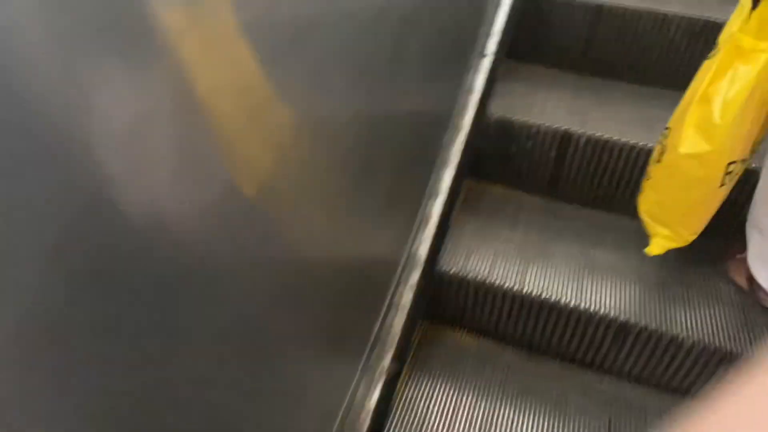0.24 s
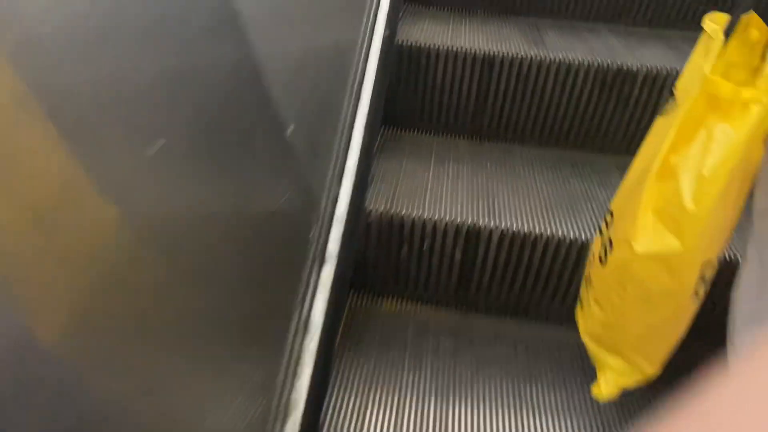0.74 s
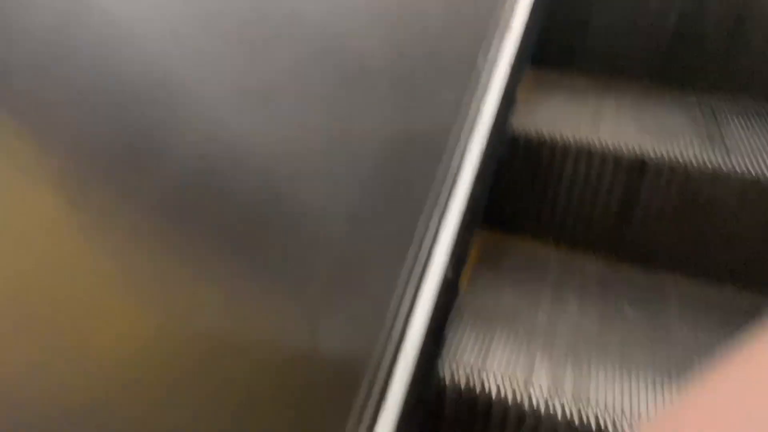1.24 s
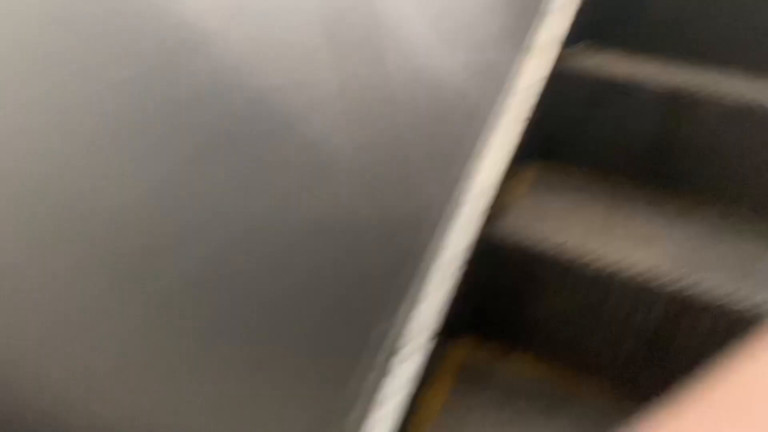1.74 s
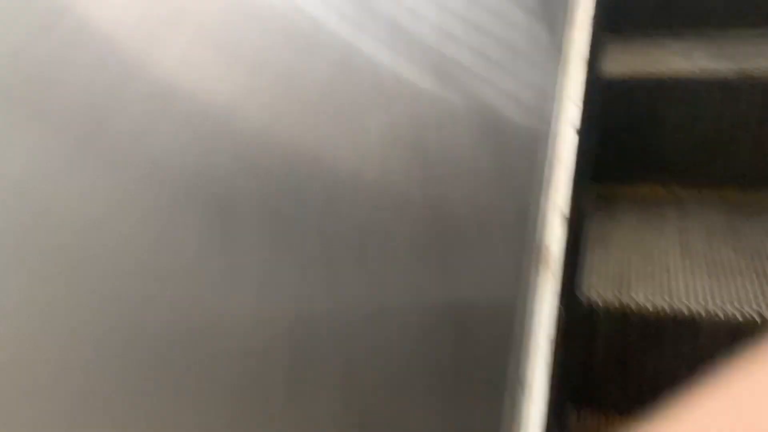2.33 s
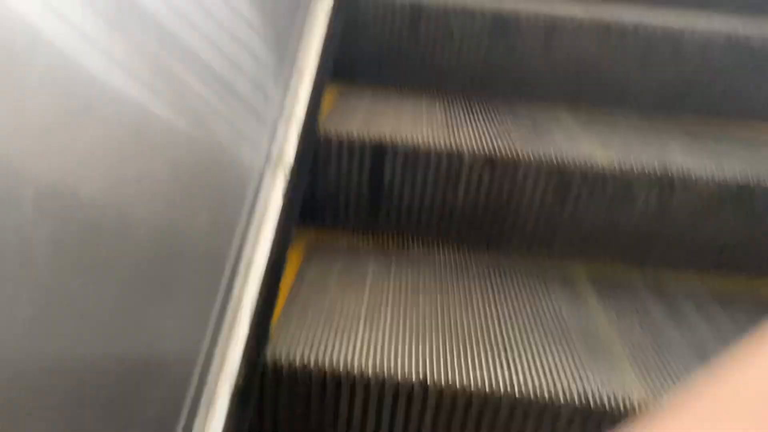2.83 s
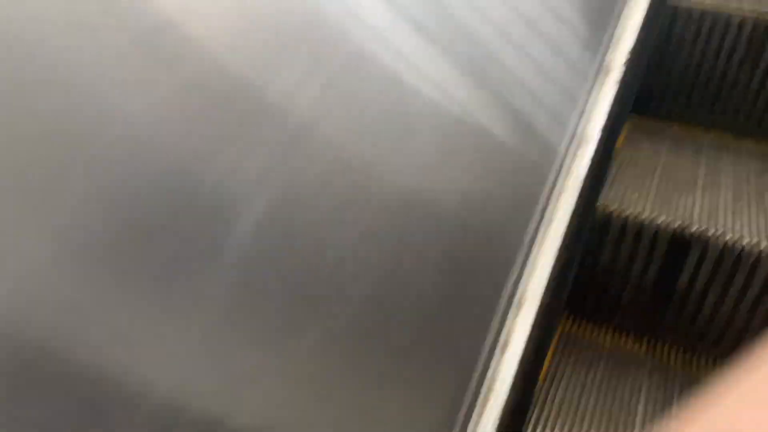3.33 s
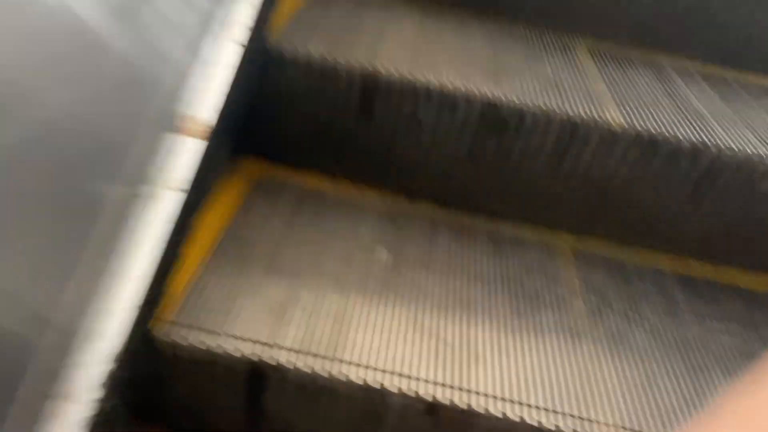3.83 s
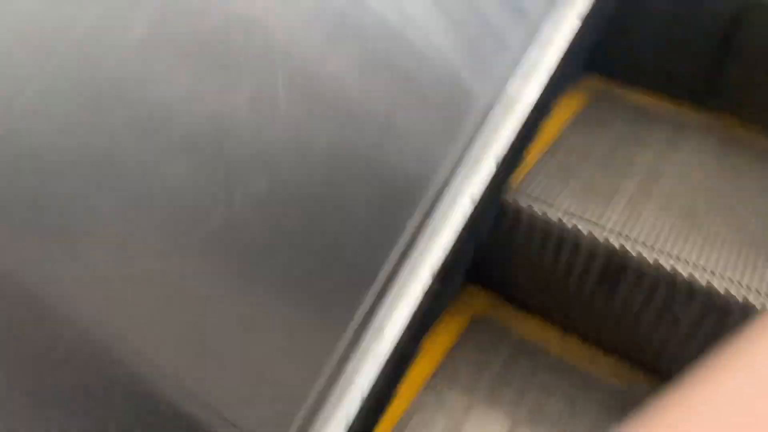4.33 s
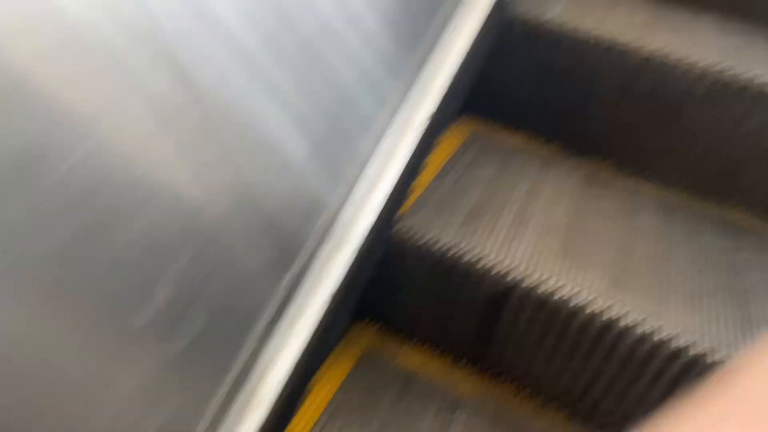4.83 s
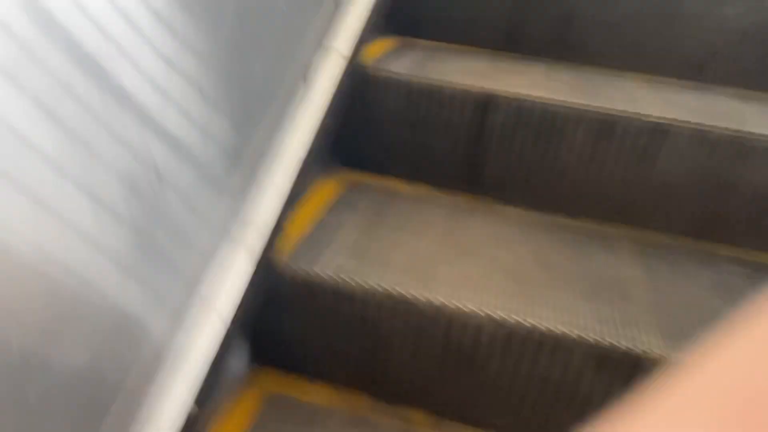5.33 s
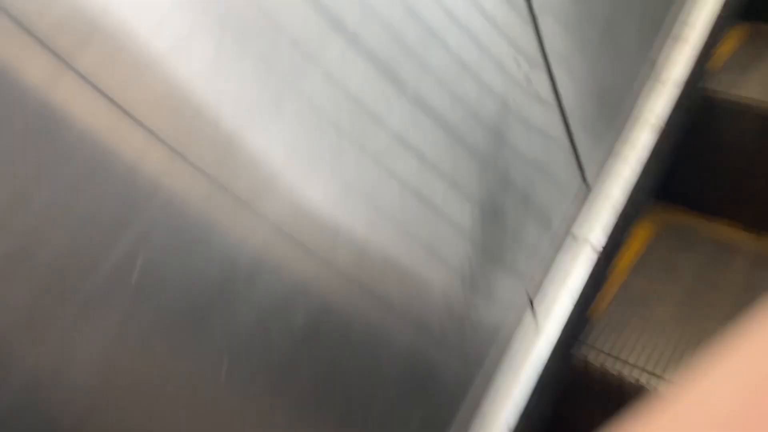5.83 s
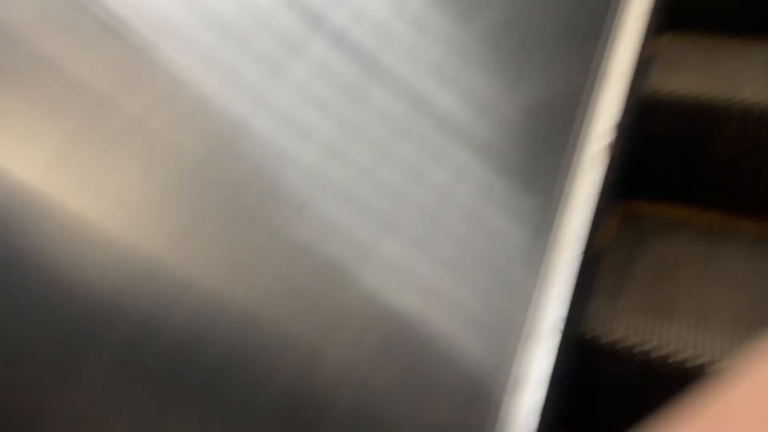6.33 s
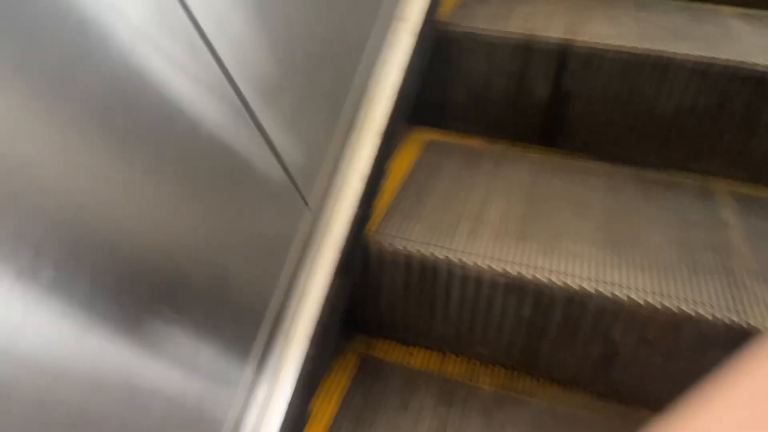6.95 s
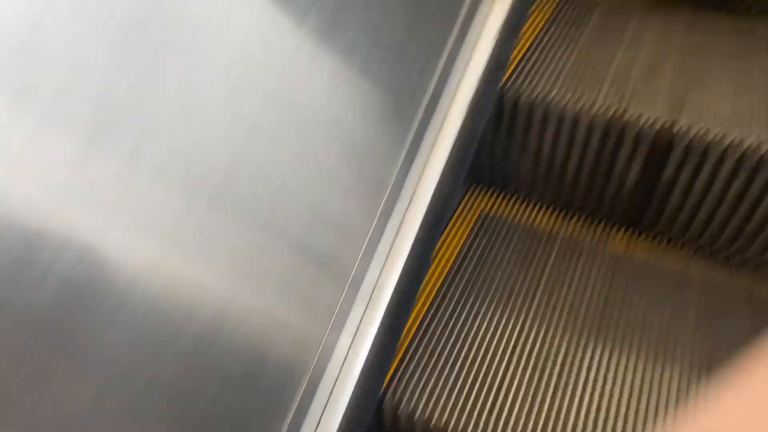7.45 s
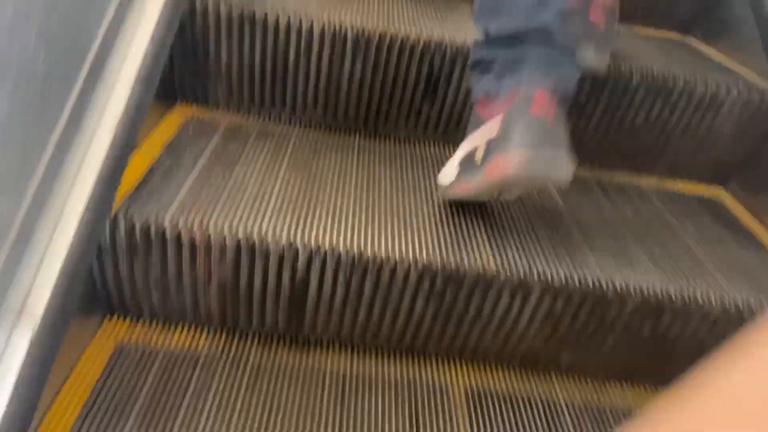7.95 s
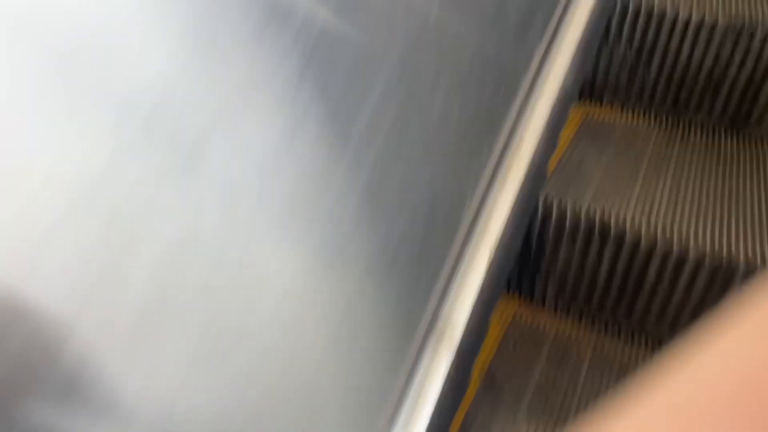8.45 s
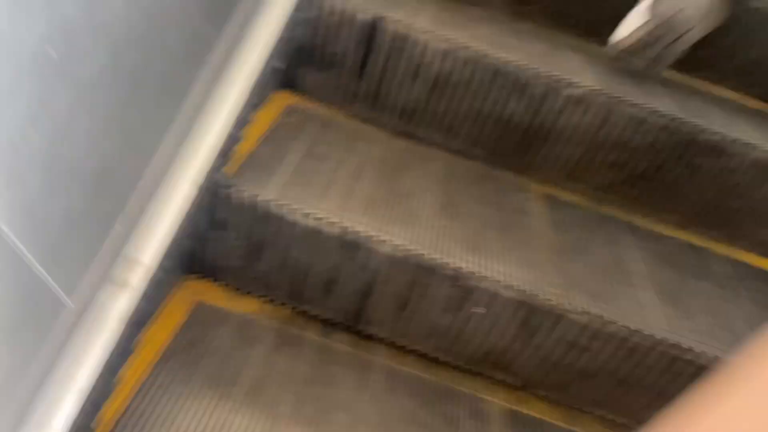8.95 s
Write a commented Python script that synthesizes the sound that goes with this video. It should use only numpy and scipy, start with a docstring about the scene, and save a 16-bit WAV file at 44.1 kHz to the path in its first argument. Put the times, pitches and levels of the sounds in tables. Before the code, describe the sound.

Rollers rumble and rattle steadily under an escalator rider in a tiled hall, while the drive hums in slow swells. At first a thin whine comes and goes and the metal steps knock lightly. Later their hollow clacks grow harder and closer together, ringing briefly off the walls. Near the hand-held microphone, thin material gives tiny crinkles, something brushes the side panel once, and the treads are softly scuffed.

```python
"""A running escalator in a tiled hall, heard from its steps through a hand-held stereo microphone.
The drive hums, swelling as the rider passes through its standing waves; rollers rumble and rattle,
and the hollow metal steps clack, louder in the second half, with the hard walls answering.
A thin whine is left behind early on. Close to the microphone, thin material crinkles,
something brushes the side panel, and the treads are softly scuffed."""
import sys
import numpy as np
from scipy import signal
from scipy.fft import rfft, irfft, next_fast_len
from scipy.io import wavfile
from scipy.ndimage import uniform_filter1d, minimum_filter1d, map_coordinates

SR = 44100
rng = np.random.default_rng(int(sys.argv[2]) if len(sys.argv) > 2 else 0)


def log_audio(samples):
    """Write samples as a 16-bit WAV file to the path given in sys.argv[1]."""
    # one column per channel
    frames = np.atleast_2d(samples).T
    # limit to full scale, then quantise
    limited = np.clip(frames, -1, 1)
    pcm = np.round(limited * 32767).astype(np.int16)
    wavfile.write(sys.argv[1], SR, pcm)


N = 404838

# modes of a hollow metal step: (frequency [Hz], relative level [dB], t60 [s])
STEP_MODES = [(416, -2, 0.28), (485, -1.5, 0.44), (580, -9, 0.33), (629, 0, 0.23), (742, 2.5, 0.35),
              (797, 4.5, 0.36), (857, -9, 0.32), (1044, -3.5, 0.34), (1270, -5.5, 0.13), (1436, -1, .17),
              (1725, -2, 0.13), (2050, -2.5, .11), (2210, -3.5, 0.12), (2350, 0, 0.13)]


def amp(db):
    """Decibels to gain."""
    return 10 ** (np.asarray(db) / 20)


def unit(x):
    """Scale to rms 1."""
    return x / np.sqrt(np.mean(x ** 2) + 1e-20)


def along(points, hz):
    """Read (frequency, value) points on a log axis."""
    freqs, values = np.transpose(points)
    return np.interp(np.log(hz + 1), np.log(freqs + 1), values)


def curves(rows):
    """One value per sample for each column after the time."""
    times, *columns = np.transpose(rows)
    return [np.interp(np.arange(N) / SR, times, column) for column in columns]


def wobble(rate, size=N):
    """A smooth random curve, rate knots a second."""
    knots = rng.standard_normal(int(size * rate / SR) + 4)
    return map_coordinates(knots, [np.arange(size) * rate / SR])


def arch(start_s, length_s):
    """Half a sine over the given stretch, zero outside it."""
    return abs(np.sin(np.pi * np.clip((np.arange(N) / SR - start_s) / length_s, 0, 1)))


def envelope(start_s, length_s, attack_s, release_s):
    """Rise, hold until the length is over, die away."""
    t = np.arange(N) / SR - start_s
    return np.clip(t / attack_s, 0, 1) * np.exp(-np.maximum(t - length_s, 0) / release_s)


def filtered(x, response):
    """Pass x through a frequency response."""
    size = x.shape[-1]
    padded = next_fast_len(size + SR // 4)
    return irfft(rfft(x, padded) * response(np.fft.rfftfreq(padded, 1 / SR)), padded)[..., :size]


def noise(colour_db, size=N):
    """Coloured stereo noise of rms 1; the two microphone ports agree best in the bass."""
    # likeness of left and right: (frequency [Hz], correlation before clipping)
    likeness = [(100, 1), (330, 0.98), (500, 0.74), (800, 0.34), (1500, 0.86), (2400, 0.54), (4000, 0.52),
                (6000, 0.16), (7500, -1.9), (11500, -0.89), (13000, 0.96)]

    def mid_and_side(hz):
        angle = np.arccos(np.clip(along(likeness, hz), -1, 1)) / 2
        return amp(colour_db(hz)) * [np.cos(angle), np.sin(angle)]

    mid, side = filtered(rng.standard_normal((2, size)), mid_and_side)
    return unit(np.array([mid + side, mid - side]))


def dying(x, t60s):
    """Let each frequency of x die at its own speed."""
    hz, t, bands = signal.stft(x, SR, nperseg=256)
    fade = np.exp(-np.log(1000) * t / along(t60s, hz)[:, None])
    return signal.istft(bands * fade, SR, nperseg=256)[1][:, :x.shape[1]]


def patchy(x, depth_db):
    """Narrow bands swell and fade on their own."""
    bands = signal.stft(x, nperseg=2048)[2]
    patches = uniform_filter1d(rng.standard_normal(bands.shape[1:]), size=3, axis=0)
    patches = unit(uniform_filter1d(patches, size=7, axis=1))
    return unit(signal.istft(bands * amp(depth_db * patches), nperseg=2048)[1][:, :N])


def resonances(hz, width_hz):
    """Humps of height 1 at the modes of a step."""
    return sum(1 / (1 + ((hz - mode_hz) / width_hz) ** 2) for mode_hz, _, _ in STEP_MODES)


def ringing(t, hz, gain, t60, port_spread_rad):
    """Decaying modes, each at a slightly different phase in the two ports."""
    phase = 2 * np.pi * rng.random(hz.shape) + rng.normal(0, port_spread_rad, (2, *hz.shape))
    return np.sum(gain * np.exp(-np.log(1000) * t / t60) * np.sin(2 * np.pi * hz * t + phase), axis=1)


def add(track, start_s, sound):
    """Mix a sound into the track."""
    stretch = track[:, max(round(start_s * SR), 0):][:, :sound.shape[-1]]
    stretch += sound[..., :stretch.shape[1]]


def drive_hum(drive_hz=65.15, swell_db=-0.43, waver_db=0.5, drift_rad=0.12, blur_rad=0.13):
    """Four orders of the motor swell and fade as the microphone rides through their standing waves."""
    # from one node to the next: (order, start [s], length [s], peak [dB])
    passages = [(1, -0.85, 2.95, -25), (1, 2.5, 3.38, -17.5), (1, 6, 1.85, -19), (1, 8, 2.5, -16.5),
                (2, 0.3, 0.8, -25.5), (2, 1, 0.9, -21), (2, 3, 1.25, -20.5), (2, 4.35, .55, -22.5),
                (2, 5.15, 1.614, -18.5), (2, 6.7, 1.65, -20), (3, 2.8, 0.8, -27.5), (3, 5.5, .6, -27),
                (3, 7.4, 1.2, -29), (4, 5.5, 1.2, -31), (4, 7.9, 1, -31), (4, 9, .7, -24.5)]
    # orders 1 to 4: power of a swell's half sine, lower is flatter
    shapes = (0.94, 0.5, 0.63, 0.67)
    # hum between swells, orders 1 to 4: (starting level [dB], rise [dB/s], waver [dB])
    beds = [(-40.5, 1.2, 1), (-35.5, -0.4, 2), (-33.5, 0.2, 1.5), (-42, 0.7, 1)]
    t = np.arange(N) / SR
    hum = np.zeros(N)
    for k, (db, rise_db_per_s, bed_waver_db) in enumerate(beds, 1):
        bed = amp(db + rise_db_per_s * t + bed_waver_db * wobble(3.5))
        swells = sum(amp(peak_db + swell_db) * arch(start, length) ** shapes[k - 1]
                     for order, start, length, peak_db in passages if order == k)
        phase = 2 * np.pi * (k * drive_hz * t + rng.random())
        phase += k * drift_rad * wobble(3) + (k - 1) * blur_rad * wobble(18)
        hum += np.sqrt(2) * np.hypot(bed, swells) * amp(waver_db * wobble(7)) * np.sin(phase)
    return hum


def whine(pitch_hz=4003, waver_db=1.5, blur_rad=0.2, attack_s=0.015, release_s=0.015, bed_db=-68):
    """A thin, slightly blurred tone that comes in fluttering spells and is left behind."""
    # louder spells: (start [s], length [s], level [dB])
    spells = [(-.02, 0.11, -45.5), (.11, .18, -52), (.71, .15, -51), (.87, 0.16, -45.5), (1.038, .13, -51),
              (1.18, 0.039, -44), (1.27, .6, -57), (2.58, 0.49, -51.5), (3.1, .55, -52)]
    phase = 2 * np.pi * pitch_hz * np.arange(N) / SR
    level = amp(bed_db) + sum(amp(db) * envelope(start, length, attack_s, release_s)
                              for start, length, db in spells)
    flutter = amp(waver_db * wobble(22))
    return level * flutter * np.sin(phase + blur_rad * np.array([wobble(35), wobble(35)]))


def running_gear(rumble_db=-21, roller_db=-26, hiss_db=-44, ring_db=4):
    """Underfoot, rollers rumble in the truss and rattle the steps, whose modes stand out of the noise."""
    # level changes along the ride: (time [s], rumble [dB], rollers [dB], hiss [dB])
    ride = [(0, -3, -1.5, -1.5), (1.2, -0.5, -2.5, -0.2), (2.2, -0.5, 0, 1.5), (3.3, 0.5, 0.4, 0.9),
            (4.1, -0.5, -0.5, 0.5), (5.5, 0.5, 0.5, 0.5), (6.6, 1, 0, -0.8), (7.8, 0.5, 0.1, 1),
            (9.18, 1.5, 1.5, 1.5)]
    # spectra of the three layers: (frequency [Hz], relative level [dB])
    rumble_colour = [(15, -29), (28, -22), (42, -3), (52, -0.5), (70, -1.5), (95, 2), (125, -0.5),
                     (165, -4), (240, -5.5), (330, -10), (500, -19.5), (1000, -84)]
    roller_colour = [(150, -22), (300, -1), (450, 0.5), (680, -1.5), (820, -4), (920, -7), (1150, -8.5),
                     (1650, -12.5), (2250, -10.5), (2650, -17), (3200, -22), (4500, -25.5), (7000, -75)]
    hiss_colour = [(1500, -9), (3000, -0.5), (4200, 1.5), (5500, -1.5), (6500, -8.5), (7500, -41),
                   (9000, -6), (10300, -9.5), (12000, -12.5), (13500, -45), (15800, -7.5)]
    rumble_ride_db, roller_ride_db, hiss_ride_db = curves(ride)
    rumble_gain = amp(rumble_ride_db + rumble_db + 1.05 * wobble(7.9))
    rumble = rumble_gain * noise(lambda hz: along(rumble_colour, hz))
    rattle_db = 0.41 * wobble(45) + 0.62 * wobble(8)
    rolling = noise(lambda hz: along(roller_colour, hz) + ring_db * resonances(hz, width_hz=2.6))
    rollers = amp(roller_ride_db + roller_db + rattle_db) * patchy(rolling, depth_db=2)
    flicker_db = 0.77 * wobble(25) + 0.41 * wobble(5.3)
    hiss = amp(hiss_ride_db + hiss_db + flicker_db) * noise(lambda hz: along(hiss_colour, hz))
    return rumble + rollers + hiss


def struck_spot(t, body_hz, body_db, clang_hz, clang_db, clang_t60=0.052, split=0.077):
    """The spot hit sets the pitch: a hollow low mode and a short clang of three close higher ones."""
    body_t60 = 0.15 * amp(0.55 * body_db)  # rings longer when struck squarely
    clang = [(clang_hz * (1 + k * split), amp(clang_db) / np.sqrt(3), clang_t60) for k in (-1, 0, 1)]
    hz, gain, t60 = np.transpose([(body_hz, amp(body_db), body_t60), *clang])[:, :, None]
    return ringing(t, hz, gain, t60, port_spread_rad=0.4)


def step_blows(blows, level_db=-4, ring_db=-12, hollow_db=5, crack_db=6, crack_s=0.0092,
               rebound_db=0.5, snap_s=0.0086, rub_db=-8, rough_db=4):
    """Each blow snaps, sets off a dense clatter in the hollow step and leaves its modes ringing."""
    # spectra of the clatter and the crisp first contact: (frequency [Hz], relative level [dB])
    clatter_colour = [(120, -1), (250, -1), (450, 6), (800, -1), (930, 0), (1250, -0.5), (1700, -4),
                      (2100, 1), (2450, -4.5), (2900, -12.5), (4000, -23), (6000, -25), (8000, -89),
                      (12000, -59)]
    snap_colour = [(2000, -10), (2900, 2), (3600, -2.5), (4300, -9), (6000, -12), (7500, -47), (10000, -19),
                   (13000, -44)]
    # decay of the step's shell: (frequency [Hz], t60 [s])
    shell_decay = [(300, 0.18), (800, 0.18), (2200, 0.19), (5000, 0.24), (12000, 0.027)]
    out, t = np.zeros((2, N)), np.arange(SR // 2) / SR
    hz, mode_db, t60 = np.transpose(STEP_MODES)[:, :, None]
    for start, db, thud_db, edge_db, snap_db, *spot, slide_s in blows:
        # where the step is hit tilts its colour
        tilt = [(530, thud_db), (1190, 0), (2440, edge_db), (3600, -4)]

        def colour_db(f):
            return along(clatter_colour, f) + along(tilt, f) + hollow_db * resonances(f, width_hz=10.6)

        clatter = dying(noise(colour_db, len(t)), shell_decay)
        strength = amp(mode_db + 0.5 * along(tilt, hz) + rng.normal(0, 1.9, hz.shape))
        ring = ringing(t, hz, strength, t60, port_spread_rad=0.39)
        ring *= amp(ring_db + 0.6 * edge_db)  # most after a blow on the edge
        # the step has play: it touches twice within a few milliseconds
        rebound_s = rng.uniform(0.004, 0.008)
        first_db = (crack_db + 0.16 * edge_db) * np.exp(-t / crack_s)
        second_db = rebound_db * np.exp(-(2 * (t - rebound_s) / crack_s) ** 2)
        clatter *= amp(first_db + second_db)
        # a sliding contact starts more softly, then catches and lets go
        onset = 1 - np.exp(-t / (0.0005 + 0.15 * slide_s))
        slid = t / slide_s
        rub = slid * np.exp(1 - slid) * amp(rub_db + rough_db * wobble(220, len(t)))
        snap = amp(snap_db) * (np.exp(-t / snap_s) + rub) * noise(lambda f: along(snap_colour, f), len(t))
        scrape = rub * noise(colour_db, len(t))
        blow = clatter + scrape + snap + ring + struck_spot(t, *spot)
        add(out, start, amp(db + level_db) * onset * blow)
    return out


def knocks(per_s=2.5, level_db=-30.5, spread_db=4, thud_db=3, edge_db=-8.5, snap_db=-20,
           body_hz=630, body_db=-9, clang_hz=1700, clang_db=-9, slide_s=0.013):
    """Faint dull blows in the steps, at loosely even times and scattered pitches."""
    blows = []
    for k, (when, force, pitch) in enumerate(rng.random((int(per_s * N / SR), 3))):
        db = level_db + spread_db * (2 * force - 1)
        detune = 2 ** (pitch - 0.5)
        blows.append(((k + when) / per_s, db, thud_db, edge_db, snap_db,
                      body_hz * detune, body_db, clang_hz * detune, clang_db, slide_s))
    return step_blows(blows)


def clacks():
    """The metal steps clack, harder in the second half of the ride."""
    # (time [s], level [dB], thud [dB], edge [dB], snap [dB], body [Hz], body [dB], clang [Hz],
    # clang [dB], slide [s]); thud and edge are the clatter's low and bright parts against its middle
    blows = [(0.603, -19.5, 5, -14, -25, 516, 3, 1300, -10, 0.03),
             (1.296, -18, 6, -14, -25, 465, -6, 1300, -6, .008),
             (1.835, -20, 3, -6, -8, 625, -9, 2120, -8, 0.014),
             (2.263, -14.5, -2, -19, -22, 787, 1, 1260, -2, .001),
             (2.674, -19, 0, -7, -20, 620, -1, 2000, -8, .002),
             (3.156, -18.5, -1, -9.5, -22, 740, -5, 1266, -1, .001),
             (3.83, -16, -4.5, -15, -30, 631, 0, 1850, -4, .001),
             (4.439, -16, 5.5, -5, -16, 444, -3, 1400, -12, .012),
             (4.494, -23, -3, -9, -15, 500, 0, 2100, -6, 0.006),
             (4.579, -15, -2.5, -8, -17, 837, -1, 1950, 0, 0.0036),
             (5.047, -18, -1, -14, -16.5, 750, -5, 1330, -2, 0.0023),
             (5.474, -16.5, -3.5, -3.5, -16, 504, 3.5, 2320, -3, .003),
             (5.772, -19, -2, -6, -19, 636, -3, 2100, -2, .012),
             (5.819, -17.5, 4, -17, -22, 480, 0, 1270, 0, 0.0066),
             (6.089, -12.5, -2.5, -1, -11, 496, 4.5, 2590, 3.5, 0.0032),
             (6.41, -20, 0, 0.5, -21, 796, 4, 2070, 1, .012),
             (6.531, -19, -5, -9, -9.5, 801, 2, 1260, -4, .011),
             (6.581, -19.5, 8, -2.5, -21, 774, -2, 1950, -3, .004),
             (6.612, -15, -8.5, -10, -13, 990, -1, 1240, -5, .007),
             (6.726, -13, 0, 3, -13.5, 1100, -0.5, 3590, -9.5, 0.0018),
             (7.011, -16.5, -6, -14, -18, 797, -3, 1270, -7, 0.0022),
             (7.027, -17.5, 5.5, 2, -12, 626, -1, 2220, -3, 0.015),
             (7.072, -15.5, -12, -8, -16, 796, -5, 1270, -6, 0.013),
             (7.213, -10, 2, -11.5, -23, 420, 1, 1464, -2, 0.0018),
             (7.306, -11.5, -7, -2.5, -16.5, 954, 0, 2150, -4, .008),
             (7.608, -8.5, -4.5, 4, -28, 802, 1.5, 2000, 3, .004),
             (7.905, -14, -8, -10, -18.5, 774, -5, 1290, 3, 0.0048),
             (8.232, -16, 4, 1, -10.5, 560, -5, 2400, 2, 0.011),
             (8.325, -14.5, 6.5, -12, -24, 628, 2, 1910, -6, 0.0019),
             (8.572, -12, -6, -2, -14.5, 764, -1, 2050, -2.5, 0.0023),
             (8.601, -20.5, -9, -6, -11, 1010, -6, 2180, 0, 0.011)]
    return step_blows(blows)


def crinkles(level_db=-5.5, decay_s=0.0088):
    """Single creases of thin plastic or cloth snap close to the microphone."""
    # creases: (time [s], relative peak [dB], brightness [dB])
    creases = [(1.377, -37, 7), (1.881, -31, 0), (3.449, -28.5, -2), (6.612, -32, -0.5), (7.168, -41, 3),
               (7.304, -38.5, 3), (7.396, -35.5, 9), (7.552, -38, 7), (8.571, -38, 7)]
    # spectrum of a crease: (frequency [Hz], relative level [dB])
    colour = [(1500, -21), (4000, 2.5), (6000, 4), (7500, -14.5), (10000, 6), (12000, -7), (13500, -16),
              (15500, -12)]
    out, t = np.zeros((2, N)), np.arange(SR // 16) / SR
    for start, db, bright_db in creases:
        burst = noise(lambda hz: along(colour, hz) + along([(6500, 0), (9000, bright_db)], hz), len(t))
        add(out, start, amp(db + level_db) * np.exp(-t / decay_s) * burst)
    return out


def swish(start_s=2.41, length_s=0.1, db=-37, attack_s=0.059, release_s=0.079):
    """Close by, something brushes briefly along the steel side panel."""
    # spectrum of the brushing: (frequency [Hz], relative level [dB])
    colour = [(2500, -21), (4400, -1), (5300, -7), (7000, -32), (10000, -23), (13000, -55)]
    stroke = amp(db) * envelope(start_s, length_s, attack_s, release_s)
    return stroke * noise(lambda hz: along(colour, hz))


def scuffs(attack_s=0.008, release_s=0.02, rough_db=3):
    """Soft, uneven rubbing on the nearby treads."""
    # strokes: (start [s], length [s], level [dB])
    strokes = [(4.174, 0.028, -33), (7.277, .03, -25.5), (8.733, 0.076, -28.5), (8.871, 0.077, -30.5)]
    # spectrum of the rubbing: (frequency [Hz], relative level [dB])
    colour = [(300, -26), (900, -0.5), (1250, 2), (1700, -5), (2250, -2.5), (3000, -13.5), (6000, -36),
              (9000, -68)]
    level = sum(amp(db) * envelope(start, length, attack_s, release_s) for start, length, db in strokes)
    return level * amp(rough_db * wobble(90)) * noise(lambda hz: along(colour, hz))


def hall(x):
    """The tiled walls answer with a diffuse tail."""
    # reverberation: (frequency [Hz], t60 [s])
    decay = [(200, 1.0), (1000, 0.5), (3000, 0.18), (10000, 0.83)]
    tail = dying(rng.standard_normal((2, SR)), decay)
    return signal.fftconvolve(x, tail / np.linalg.norm(tail[0]), axes=1)[:, :N]


def scene(hall_db=-12):
    """From the rider's place: machine and close sounds dry, the steps with the hall around them."""
    machine = drive_hum() + whine() + running_gear()
    close = crinkles() + swish()
    steps = clacks() + knocks() + scuffs()
    return machine + close + steps + amp(hall_db) * hall(steps)


def limited(x, ceiling=0.92):
    """Turn the gain down briefly where a peak would overload."""
    needed = np.minimum(1, ceiling / (abs(x).max(axis=0) + 1e-9))
    return x * uniform_filter1d(minimum_filter1d(needed, size=200), size=200)


def record(dry, lag_s=0.000028, top_hz=15750):
    """Hand-held microphone: left port slightly earlier, right slightly louder; peaks and band limited."""
    # balance of the ports: (frequency [Hz], left over right [dB])
    balance = [(60, 0.5), (220, -1.6), (700, -1.2), (2200, -1), (8000, 0)]
    half = np.array([[0.5], [-0.5]])
    ports = filtered(dry, lambda hz: amp(half * along(balance, hz)) * np.exp(2j * np.pi * hz * lag_s * half))
    return filtered(limited(ports), lambda hz: hz < top_hz)


dry = scene()
out = record(dry)
log_audio(out)
```